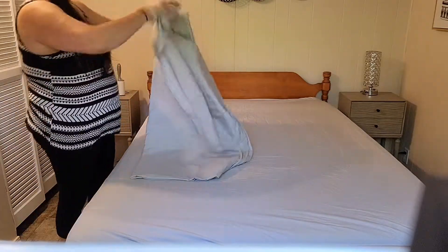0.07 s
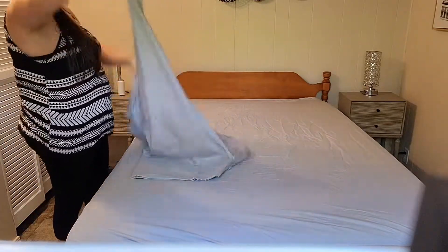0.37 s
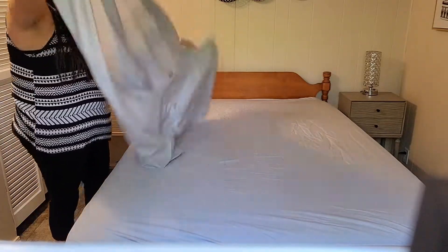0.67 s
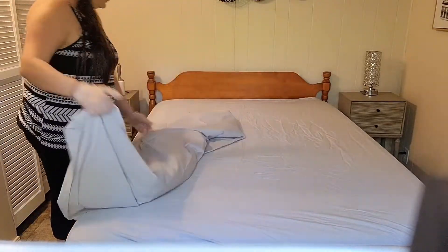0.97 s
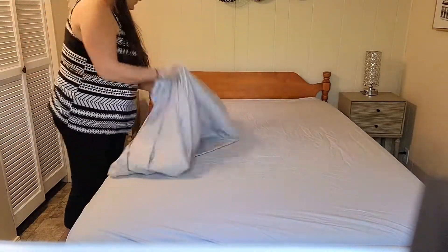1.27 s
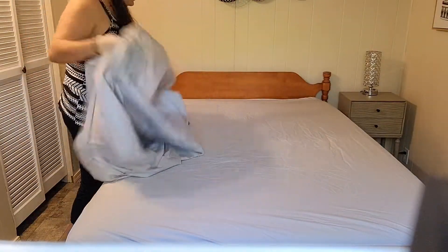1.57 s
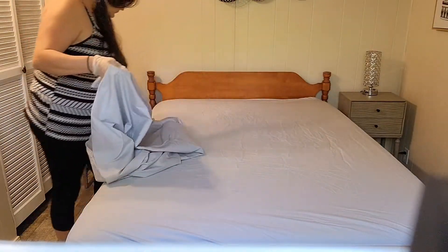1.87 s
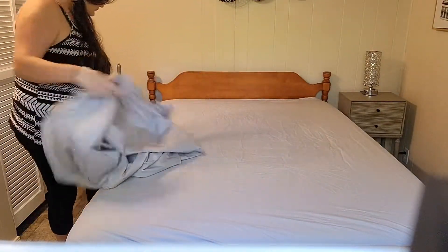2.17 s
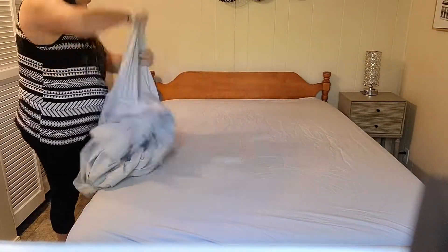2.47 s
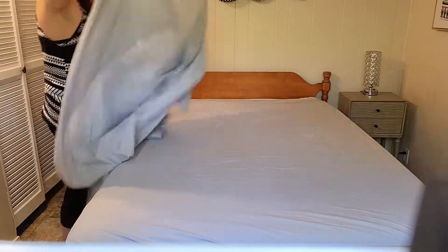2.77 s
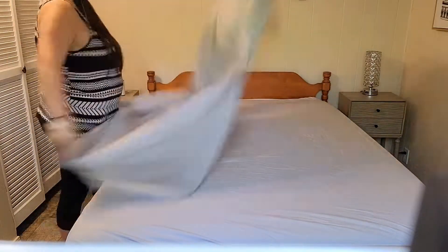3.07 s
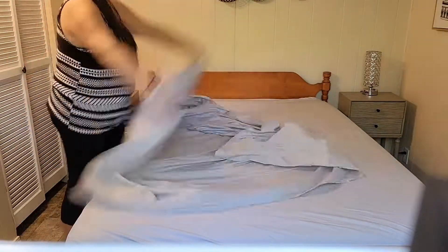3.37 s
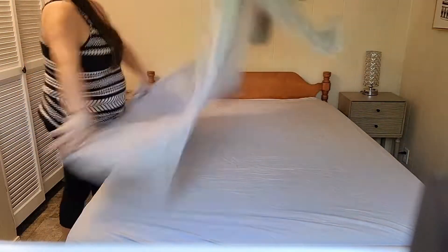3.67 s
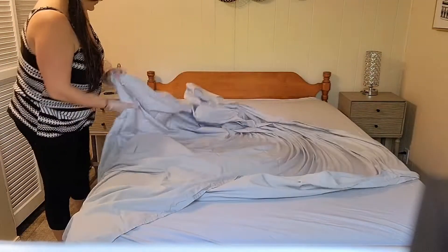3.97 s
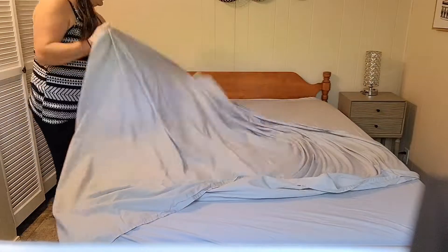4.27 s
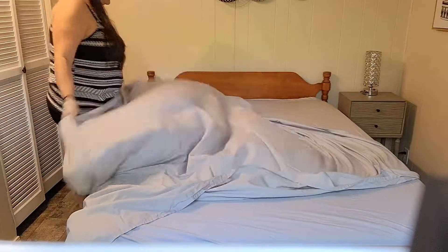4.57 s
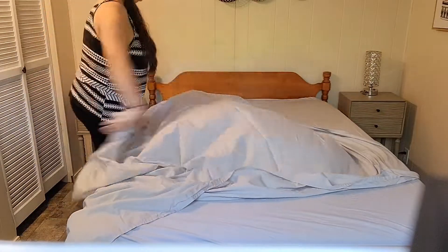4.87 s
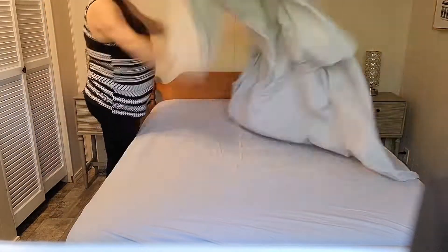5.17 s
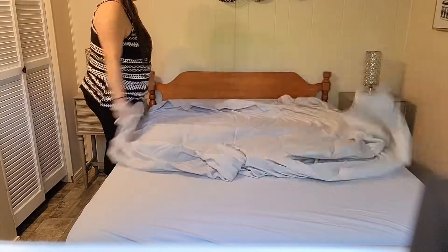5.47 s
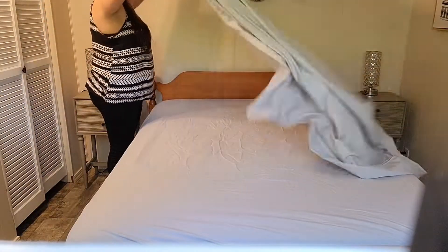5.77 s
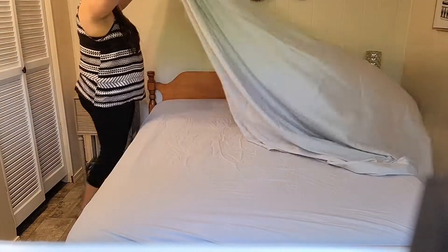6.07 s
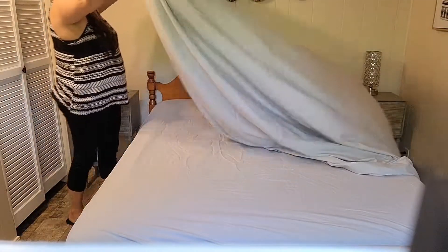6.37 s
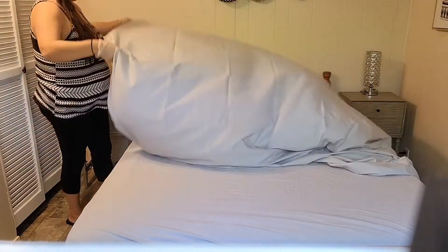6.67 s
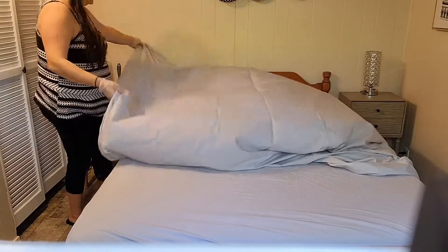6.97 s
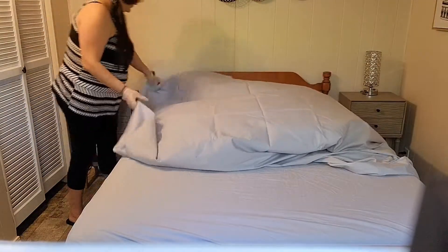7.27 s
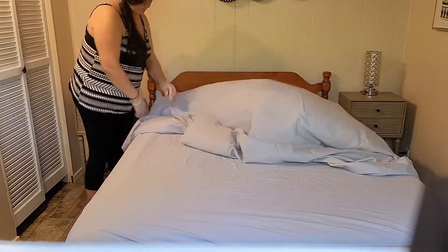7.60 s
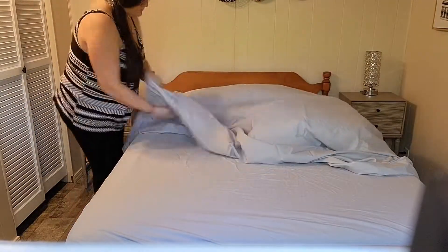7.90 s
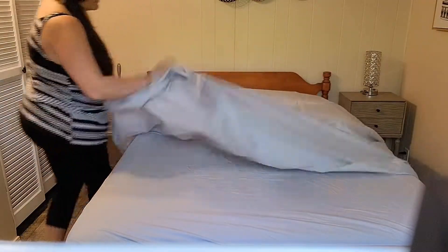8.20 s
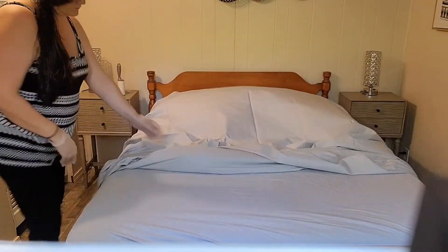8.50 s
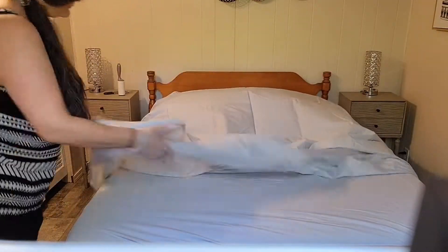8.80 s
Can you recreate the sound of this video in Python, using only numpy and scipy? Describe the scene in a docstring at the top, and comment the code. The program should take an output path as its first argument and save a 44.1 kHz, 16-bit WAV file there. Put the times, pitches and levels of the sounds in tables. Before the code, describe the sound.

A bed sheet rustles and slides as it is picked up and bunched, giving small flicks and dull bumps. Three much louder shakes follow, the first two close together, with billowing air and cracking hems. Then the cloth is drawn across the mattress in fading strokes and soft thuds. The microphone hears it from nearby in a small room with little echo, a faint hum and hiss underneath.

```python
"""A cotton sheet is gathered, shaken out three times and spread over a mattress in a small bedroom.
Folds buckle and flutter, cloth slides on cloth, hems flap taut and zip through the fingers.
Slack cloth thuds softly, and the billowing sheet pushes air across the room.
A low hum with brief swells and a faint hiss lie underneath."""
import sys
import numpy as np
from scipy import signal
from scipy.fft import rfft, irfft, next_fast_len
from scipy.io import wavfile
from scipy.ndimage import map_coordinates

SR = 44100
rng = np.random.default_rng(int(sys.argv[2]) if len(sys.argv) > 2 else 0)


def to_wav(sig):
    """Store sig (one row per channel, or 1-D mono) as 16-bit WAV at the path in sys.argv[1].

    Samples outside -1..1 are clipped; the rate is SR.
    """
    pcm = np.clip(np.atleast_2d(sig), -1, 1) * 32767
    pcm = np.round(pcm).astype(np.int16)
    wavfile.write(sys.argv[1], SR, pcm.T)  # frames by channels


N = 389844
PARTS = 3  # left, right and far part of the sheet, sounding independently

# whole-sheet swings: full_speed_s, rise_s (per 20 dB), hold_s, level_db, brightness_db
SWINGS = [(0.708, 0.13, 0.124, -54.0, -7), (1.715, 0.13, 0.009, -54.5, 0), (2.832, 0.18, 0.049, -50.0, -1),
          (3.023, 0.11, 0.064, -49.5, -5), (3.27, 0.04, 0.17, -39.5, -14), (3.617, 0.04, 0.067, -51.0, -9),
          (3.705, 0.09, 0.067, -45.5, -11), (3.871, 0.03, 0.131, -36.0, -13),
          (4.109, 0.12, 0.033, -42.5, -12), (5.203, 0.07, 0.126, -48.0, -10),
          (5.447, 0.04, 0.114, -39.0, -13), (5.622, 0.06, 0.061, -49.0, -8.5),
          (5.875, 0.15, 0.058, -49.5, -10), (8.382, 0.15, 0.227, -57.5, -5)]
SWING_T60_S, STROKE_T60_S = 0.235, 0.47


def rustle():
    """Folds buckle, layers rub, the weave slides; flutter shakes all three and friction surges."""
    # spectra: freq_hz, level_db
    fold_spectrum = [(60, -17), (115, -2), (190, -2), (255, -.5), (340, -1.5), (720, -.5), (1050, -6.5),
                     (1700, -9.5), (3500, -27.5), (9000, -68)]
    rub_spectrum = [(400, -41), (900, -12.5), (1200, 1.5), (1600, -2), (2050, 1.5), (2500, -3), (3200, -3),
                    (4500, -10.5), (8000, -28.5)]
    slide_spectrum = [(1500, -36), (2800, 1), (3800, -2), (5200, -2.5), (6400, -11), (8000, -19),
                      (11000, -24.5), (16000, -45)]
    fizz_spectrum = [(4000, -33), (6500, -0.5), (8500, -3.5), (10500, -5.5), (13000, 1.5), (16000, 0.5)]  # finest thread noise
    flutter, surges = wobble(rate_hz=45), wobble(rate_hz=16)
    buckles = creases(rate_hz=700, spread_db=13.5, rush=0.92, size=N)
    folds = amp(-0.7 + 2.3 * flutter) * coloured(buckles, fold_spectrum)
    catches = creases(rate_hz=500, spread_db=20, rush=1.34, size=N)
    rubbing = amp(-2.4 + 1.6 * flutter + 0.8 * surges) * coloured(catches, rub_spectrum)
    threads = creases(rate_hz=900, spread_db=19, rush=3.0, size=N)
    weave = coloured(threads, slide_spectrum) + amp(-8.5) * coloured(threads, fizz_spectrum)
    sliding = amp(0.8 + 1.3 * flutter + 0.4 * surges) * weave
    return handling(0) * folds + handling(0.21) * rubbing + handling(0.92) * sliding


def creases(rate_hz, spread_db, rush, size):
    """Per sheet part: tiny uneven snaps at random times over the smooth rush of countless threads."""
    snaps = np.zeros((PARTS, size))
    hit = rng.random(snaps.shape) < rate_hz / SR
    strength = rng.uniform(-1.05, 1, snaps.shape)[hit]
    snaps[hit] = np.sign(strength) * amp(spread_db * np.abs(strength))
    return unit(snaps) + rush * rng.standard_normal(snaps.shape)


def handling(bright_share):
    """Gain of a rustle layer: swings and hand strokes, summed in power."""
    # hands gather, drag, smooth: full_speed_s, rise_s (per 20 dB), hold_s, level_db, brightness_db
    strokes = [(0.0, 0.02, 0.156, -62.0, -3), (0.192, 0.08, 0.139, -62.0, -1.5),
               (0.431, 0.05, 0.043, -57.5, -6), (0.583, 0.16, 0.087, -58.5, 3),
               (0.87, 0.1, 0.068, -62.0, -3), (1.022, 0.14, 0.113, -57.5, -7),
               (1.239, 0.11, 0.097, -67.5, -5), (1.436, 0.27, 0.208, -62.0, -3),
               (1.817, 0.09, 0.156, -65.5, -5), (2.412, 0.31, 0.106, -60.5, -3),
               (2.602, 0.09, 0.147, -63.0, -4), (3.126, 0.1, 0.094, -69.0, -1),
               (3.479, 0.1, 0.042, -64.5, 2), (4.243, 0.11, 0.11, -61.5, -2),
               (4.517, 0.14, 0.128, -56.0, -1), (4.712, 0.11, 0.083, -57.5, -4),
               (4.856, 0.1, 0.065, -64.0, -2.5), (5.007, 0.11, 0.089, -64.0, -3.5),
               (5.363, 0.1, 0.049, -58.5, -6.5), (5.711, 0.1, 0.116, -61.0, -3),
               (5.984, 0.11, 0.293, -64.5, -4), (6.363, 0.1, 0.274, -74.0, -4),
               (6.787, 0.42, 0.223, -69.0, -4), (7.08, 0.1, 0.066, -78.0, -4),
               (7.425, 0.36, 0.147, -70.5, -1), (7.645, 0.13, 0.131, -64.5, -6),
               (8.051, 0.08, 0.047, -64.0, 0), (8.198, 0.13, 0.048, -65.0, -3)]
    swinging = effort(SWINGS, SWING_T60_S, bright_share)
    stroking = effort(strokes, STROKE_T60_S, bright_share)
    return np.hypot(swinging, stroking)


def effort(moves, t60_s, bright_share):
    """Each move gathers speed, holds and settles; a share of its brightness adds to its level."""
    power, t = np.zeros(N), np.arange(-SR // 2, SR) / SR
    for full_speed_s, rise_s, hold_s, level_db, brightness_db in moves:
        envelope_db = 20 * np.minimum(t, 0) / rise_s - 60 * np.maximum(t - hold_s, 0) / t60_s
        gain = amp(level_db + bright_share * brightness_db + envelope_db)
        add(power, full_speed_s - 0.5, gain[t >= -full_speed_s] ** 2)
    return np.sqrt(power)


def flaps():
    """A wave runs to the hem and pulls creases taut: dull when slack, cracking when fast."""
    # start_s, level_db, crack_db (treble over body), t60_s
    taut_pulls = [(.432, -42.5, 0, .1), (.712, -42.5, 2, .08), (.814, -44.5, -6, .09),
                  (1.035, -43, -21, .1), (1.542, -44.5, -7, .1), (1.714, -37.5, 9, .06),
                  (1.955, -52, -4, .1), (2.399, -46, 5, .14), (2.441, -46, -3, .12), (2.89, -34.5, -6, .06),
                  (3.03, -39, -10, .18), (3.286, -24, -5, .17), (3.341, -25, -3, .16),
                  (3.399, -28.5, -7, .11), (3.446, -28, 11, .06), (3.616, -23.5, -20, .09),
                  (3.864, -21, 3, .08), (3.893, -20.5, -2, .14), (3.964, -20.5, 1, .11),
                  (4.033, -29, 0, .13), (5.01, -45, -10, .11), (5.448, -24, -2, .16),
                  (5.544, -26.5, 0, .13), (5.571, -29.5, -21, .14), (5.893, -34.5, -10, .07),
                  (5.977, -41.5, -9, .08)]
    # freq_hz, level_db
    flap_spectrum = [(50, -11), (110, -10), (200, -15), (330, 3.5), (720, -1.5), (1200, 3), (2500, -5),
                     (4000, -9), (5500, -11.5), (8000, -28), (11000, -56), (15500, -45)]
    out, t = np.zeros((PARTS, N)), np.arange(SR // 5) / SR
    for start_s, level_db, crack_db, t60_s in taut_pulls:
        tilt = [(900, 0), (2800, crack_db)]
        snaps = creases(rate_hz=4000, spread_db=-1, rush=1.2, size=len(t))
        flap = unit(shaped(snaps, lambda hz: along(flap_spectrum, hz) + along(tilt, hz)))
        add(out, start_s + 0.002, amp(level_db - 8) * flap * swell(t, rise_s=0.008, t60_s=t60_s))
    return out


def thuds():
    """Soft low thuds of cloth and brief swells of the low hum: rough puffs that sink in pitch."""
    # start_s, level_db, pitch_hz
    low_bumps = [(.432, -46, 200), (1.004, -47, 62), (1.545, -50, 220), (1.939, -48, 60), (2.098, -49, 125),
                 (3.25, -33, 85), (3.944, -30, 56), (5.176, -37.5, 223), (5.648, -35, 75), (5.88, -44, 155),
                 (6.194, -52, 150), (6.45, -50, 60), (6.734, -48, 62), (8.047, -42, 44), (8.403, -41, 50),
                 (8.47, -46.5, 180), (8.58, -48, 210)]
    out, t = np.zeros((PARTS, N)), np.arange(SR // 5) / SR
    envelope = swell(t, rise_s=0.0061, t60_s=0.15)
    for start_s, level_db, pitch_hz in low_bumps:
        band_db = lambda hz: -30 * np.log10(1 + (1.3 * np.log2((hz + 1) / pitch_hz)) ** 2)
        rough = unit(shaped(rng.standard_normal((PARTS, len(t))), band_db))
        push = np.sin(2 * np.pi * pitch_hz * t * (1 - 0.48 * t) + rng.normal(0, 0.55, (PARTS, 1)))
        add(out, start_s - 0.002, amp(level_db - 6) * (push + 0.33 * rough) * envelope)
    return out


def hem_slips():
    """Threads catch and release in the fingers: a narrow hiss, its pitch gliding with pull speed."""
    # start_s, level_db, pitch_hz, glide_oct_per_s, rise_s, t60_s
    slips = [(.195, -55, 3180, 3, 0.02, .13), (.538, -49, 3040, 2.5, .021, 0.4),
             (.576, -49.5, 4440, 2, 0.024, .35), (1.617, -52, 3600, 1, .012, .11),
             (2.66, -52, 3490, 2, 0.0089, 0.072), (2.76, -51, 4600, -0.5, 0.04, 0.21),
             (4.028, -38.5, 3400, 2, 0.01, 0.084), (4.47, -52, 3300, 1.5, 0.023, .35),
             (4.55, -49, 3550, 2.5, .04, .22), (6.385, -58.5, 3300, 6, 0.014, 0.12),
             (7.303, -58, 4650, -2.5, .013, .11), (7.745, -56, 3400, 1, 0.017, 0.14),
             (8.07, -62, 3290, 1, .015, .12), (8.698, -66, 5040, 0.5, 0.0077, .08)]
    jitter_spectrum = [(200, -4), (550, -9.5), (1500, -21), (5000, -36), (12000, -41)]
    out, t = np.zeros((PARTS, N)), np.arange(SR // 3) / SR
    for start_s, level_db, pitch_hz, glide_oct_per_s, rise_s, t60_s in slips:
        jitter = coloured(rng.standard_normal((PARTS, len(t))), jitter_spectrum)
        freq_hz = pitch_hz * 2 ** (glide_oct_per_s * np.minimum(t, 2 * rise_s))
        hiss = jitter * np.sin(2 * np.pi * np.cumsum(freq_hz) / SR)
        add(out, start_s, amp(level_db + 2.5) * hiss * swell(t, rise_s, t60_s))
    return out


def billow():
    """Each swing fans slow pressure waves through the room, ahead of its rustle."""
    # freq_hz, level_db
    air_spectrum = [(15, -8), (30, -4), (46, -1), (60, 6.5), (74, 6), (100, -4.5), (160, -13), (300, -25),
                    (800, -72)]
    t, lead_s = np.arange(N) / SR, 0.025
    push = np.interp(t + lead_s, t, effort(SWINGS, SWING_T60_S, bright_share=0))
    return amp(-6.5) * push * stereo_noise(air_spectrum, width=1.0)


def wall_response(size):
    """Dense stereo reflections, energy 1 per channel; the bass rings longest."""
    # freq_hz, t60_s
    decay = [(100, 0.38), (500, 0.2), (3000, 0.2), (12000, 0.22)]
    hz, t, bins = signal.stft(rng.standard_normal((2, size)), SR, nperseg=256)
    tail = signal.istft(bins * amp(-60 * t / along(decay, hz)[:, None]), SR, nperseg=256)[1]
    return tail / np.linalg.norm(tail, axis=1, keepdims=True)


def echoes(x, block=16384):
    """The sounding spot keeps moving, so each block gets its own wall response."""
    out = np.zeros((2, N))
    for start in range(0, N, block):
        reflected = signal.fftconvolve(x[None, start:start + block], wall_response(SR // 4), axes=1)
        add(out, start / SR, reflected)
    return out


def standing_waves(x):
    """Modes between walls, bed and furniture lift or cut narrow bands."""
    # centre_hz, width_hz, gain_db
    modes = [(325, 50, 3), (416, 50, -1.5), (490, 36, 2.5), (569, 11, 3), (720, 90, 4), (835, 36, 3),
             (1065, 22, 2), (1400, 200, -1), (1915, 37, 1), (2680, 11, -2.5), (2763, 16, 2.5),
             (3500, 21, 3.5), (4422, 24, 3.5), (4520, 22, -4)]
    return shaped(x, lambda hz: sum(gain_db / (1 + (2 * (hz - centre_hz) / width_hz) ** 2)
                                    for centre_hz, width_hz, gain_db in modes))


def background(hum_hz=61, hum_width_hz=8):
    """A wavering low hum, a faint rumble and the even hiss of the quiet room."""
    # time_s, level_db
    hum_levels = [(0, -65), (1.65, -61.5), (2.1, -58), (2.5, -64), (5.7, -62), (6.3, -58.5), (8.84, -61)]
    # spectra: freq_hz, level_db
    rumble_spectrum = [(15, -1), (30, 1), (50, -3), (80, -4), (120, -9), (200, -20), (500, -60)]
    hiss_spectrum = [(20, 1), (35, -2.5), (48, -14), (70, -6), (120, -10), (200, -10), (350, -9.5),
                     (700, -16.5), (1000, -23), (1600, -25), (3100, -25), (5000, -28.5), (8200, -37.5),
                     (15500, -42)]
    hum_db = np.interp(np.arange(N) / SR, *np.transpose(hum_levels))
    band_db = lambda hz: -20 * np.log10(1 + ((hz - hum_hz) / hum_width_hz) ** 2)
    mid, side = unit(shaped(rng.standard_normal((2, N)), band_db))
    hum = amp(hum_db - 0.5 + 2 * wobble(rate_hz=7)) * stereo(mid, side, width=0.7)
    rumble = amp(-65.5) * stereo_noise(rumble_spectrum, width=0.9)
    hiss = amp(-66.2) * stereo_noise(hiss_spectrum, width=1.0)
    return hum + rumble + hiss


def amp(db):
    """Decibels to gain."""
    return 10 ** (np.asarray(db) / 20)


def unit(x):
    """Scale to rms 1."""
    return x / np.sqrt(np.mean(x ** 2) + 1e-20)


def along(points, hz):
    """Interpolate (freq_hz, value) points on a log axis."""
    freq_hz, values = np.transpose(points)
    return np.interp(np.log(hz + 1), np.log(freq_hz + 1), values)


def wobble(rate_hz):
    """Smooth random curve with knots at rate_hz."""
    knots = rng.standard_normal(int(N * rate_hz / SR) + 4)
    return map_coordinates(knots, [np.arange(N) * rate_hz / SR])


def swell(t, rise_s, t60_s):
    """Envelope: quadratic rise to 1, exponential decay."""
    return np.minimum(t / rise_s, 1) ** 2 * amp(-60 * np.maximum(t - rise_s, 0) / t60_s)


def shaped(x, gain_db):
    """Filter x by gain_db(hz)."""
    size = x.shape[-1]
    padded = next_fast_len(size + 2048, real=True)
    gain = amp(gain_db(np.fft.rfftfreq(padded, 1 / SR)))
    return irfft(rfft(x, padded) * gain, padded)[..., :size]


def coloured(x, spectrum):
    """Filter x by (freq_hz, level_db) points; rms 1."""
    return unit(shaped(x, lambda hz: along(spectrum, hz)))


def stereo(mid, side, width):
    """Mid and side to left and right; rms 1."""
    return unit(np.array([mid + width * side, mid - width * side]))


def stereo_noise(spectrum, width):
    """Coloured stereo noise; rms 1."""
    mid, side = coloured(rng.standard_normal((2, N)), spectrum)
    return stereo(mid, side, width)


def add(track, start_s, sound):
    """Mix sound into track from start_s on."""
    part = track[..., max(round(start_s * SR), 0):][..., :sound.shape[-1]]
    part += sound[..., :part.shape[-1]]


def scene():
    """A wide sheet: one part direct to each channel, the far part by way of the walls."""
    left, right, far = rustle() + flaps() + thuds() + hem_slips()
    sheet = amp(-0.63) * np.array([left, right]) + amp(-4.5) * echoes(far)
    balance = amp([[0.3], [-0.3]])
    return (standing_waves(sheet) + billow()) * balance + background()


def record(dry):
    """Brick-wall low-pass."""
    cutoff_hz = 15750
    return shaped(dry, lambda hz: np.where(hz < cutoff_hz, 0, -120))


dry = scene()
out = record(dry)
to_wav(out)
```